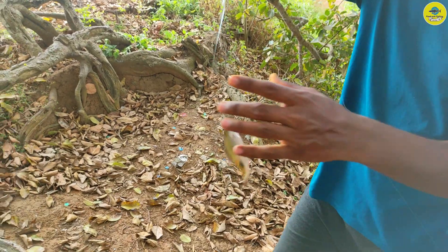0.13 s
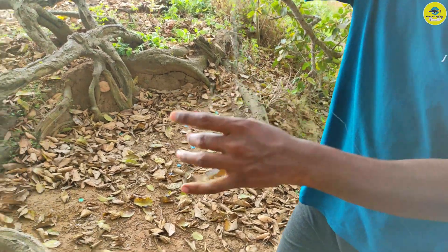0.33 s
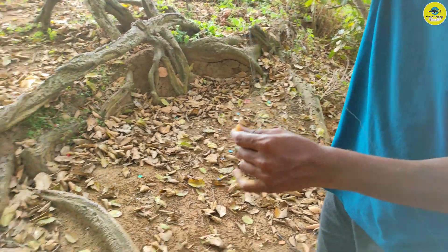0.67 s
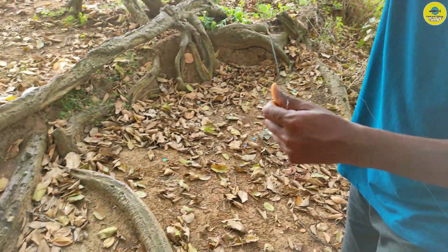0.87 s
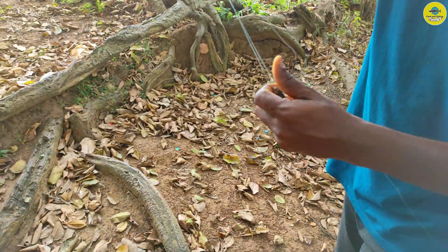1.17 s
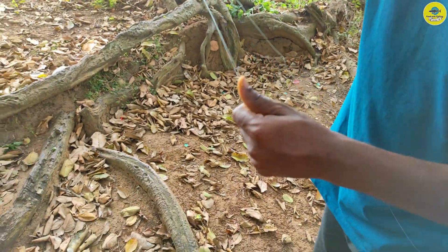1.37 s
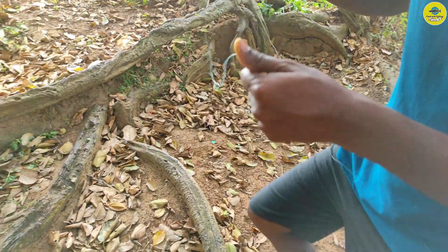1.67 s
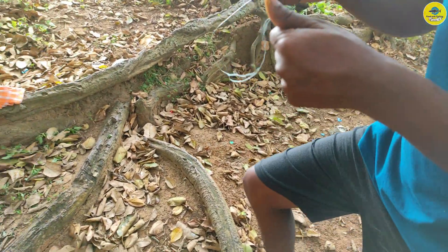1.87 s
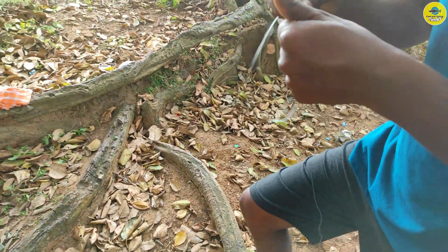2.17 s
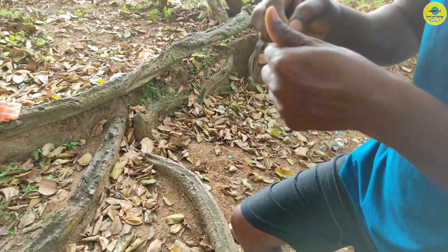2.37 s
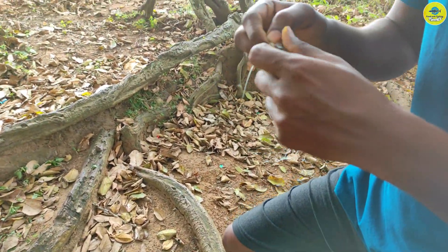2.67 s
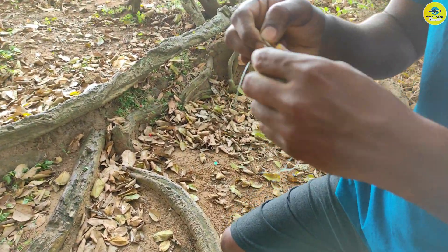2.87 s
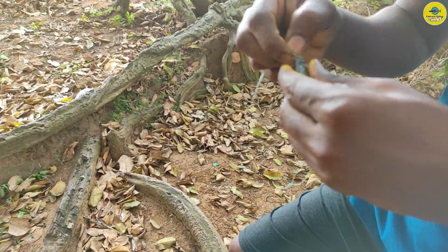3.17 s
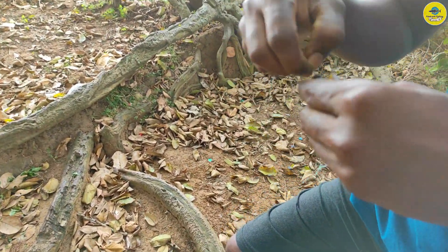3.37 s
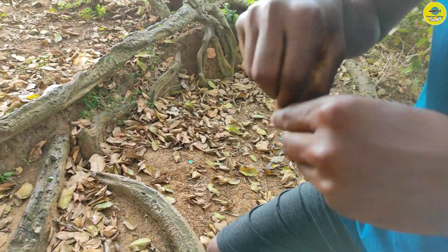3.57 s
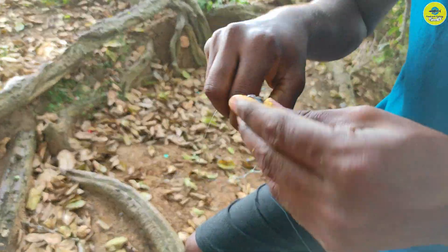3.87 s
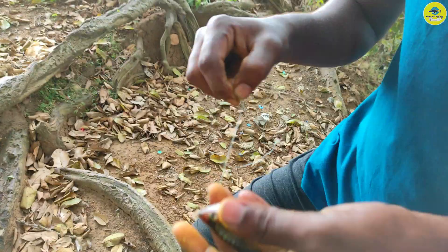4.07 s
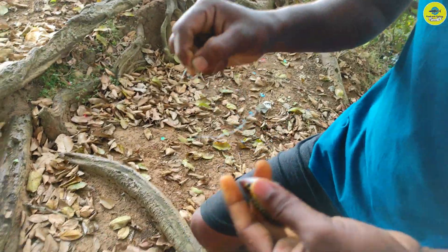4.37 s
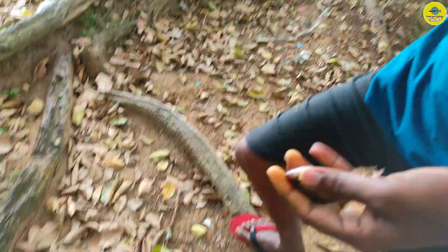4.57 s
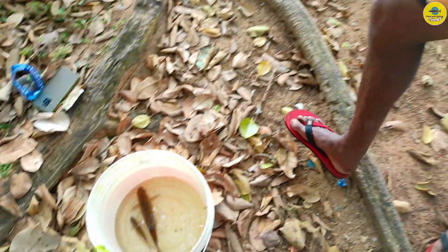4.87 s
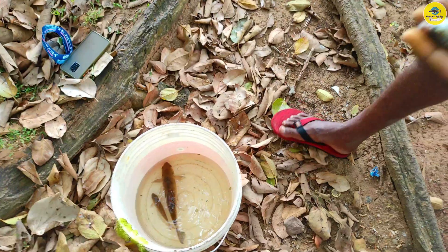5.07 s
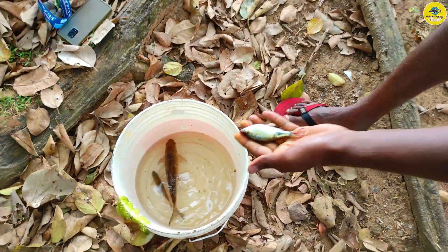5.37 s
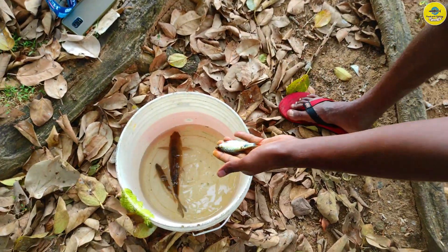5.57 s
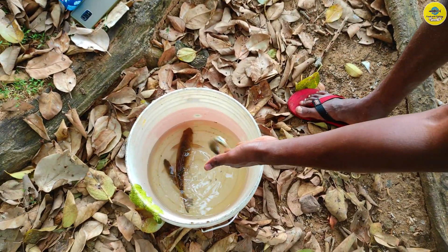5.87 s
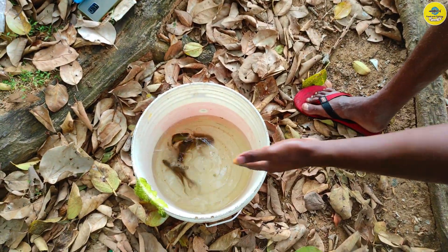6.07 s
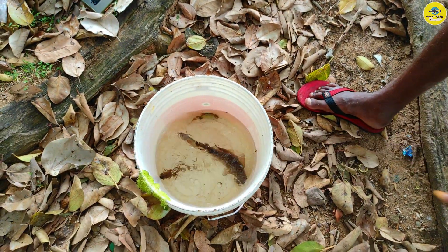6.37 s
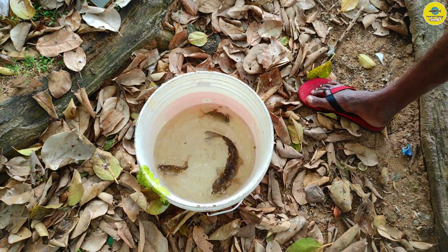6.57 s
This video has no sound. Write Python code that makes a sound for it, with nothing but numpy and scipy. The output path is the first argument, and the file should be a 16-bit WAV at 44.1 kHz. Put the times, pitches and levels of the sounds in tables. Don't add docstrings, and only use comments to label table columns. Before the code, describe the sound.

Dry leaves crunch and rustle underfoot, first a dragging shuffle, then separate hard steps with bright snaps and soft low thumps, quieter crackling between them. A dense flurry of crackles around five seconds thins to scattered ticks before a small wet plop, droplets and bubbles in a bucket. The place is open, with only a short diffuse reflection, faint wind and distant river. Close handheld stereo microphone, crisp and slightly coarse.

```python
import sys
import numpy as np
from scipy import signal
from scipy.fft import rfft, irfft, next_fast_len
from scipy.io import wavfile
from scipy.ndimage import uniform_filter1d, minimum_filter1d, map_coordinates

SR = 44100
rng = np.random.default_rng(int(sys.argv[2]) if len(sys.argv) > 2 else 0)


def elevation(decibels):
    levels = np.asarray(decibels, float)
    return 10 ** (levels / 20)


def generate_wav(signal):
    frames = np.transpose(np.atleast_2d(signal))
    scaled = np.clip(frames, -1, 1) * 32767
    pcm = np.round(scaled).astype(np.int16)
    wavfile.write(sys.argv[1], SR, pcm)


N = 296793

# f/Hz, gain/dB
LEAF_BODY = [(300, -34), (800, -7), (1100, -3), (2400, -0.5), (4500, 2), (6000, -3), (9000, -36)]


def unit(x):
    return x / np.sqrt(np.mean(x ** 2) + 1e-20)


def along(points, hz):
    f, value = np.transpose(points)
    return np.interp(np.log(hz + 1), np.log(f + 1), value)


def curves(rows):
    s, *columns = np.transpose(rows)
    return [np.interp(np.arange(N) / SR, s, column) for column in columns]


def wobble(rate):
    knots = rng.standard_normal(int(N * rate / SR) + 4)
    return map_coordinates(knots, [np.arange(N) * rate / SR])


def filtered(x, response):
    size = 2 * next_fast_len(N // 2 + 4096)
    hz = np.fft.rfftfreq(size, 1 / SR)
    return irfft(rfft(x, size) * response(hz), size)[..., :N]


def crisp(hz, edge_hz=6100):
    return 1 / (1 + (edge_hz / (hz + 1)) ** 5)


def shape(points):
    return lambda hz: elevation(along(points, hz))


def sides(pan_db):
    return np.array([elevation(pan_db / 2), elevation(-pan_db / 2)])


def pair(colour):
    # f/Hz, likeness 0..1
    likeness = [(30, 0.46), (150, 0.79), (600, 0.61), (1500, 0.45), (4000, 1), (9000, 0.37)]

    def mid_and_side(hz):
        angle = np.arccos(np.clip(along(likeness, hz), -1, 1)) / 2
        return colour(hz) * [np.cos(angle), np.sin(angle)]

    mid, side = filtered(rng.standard_normal((2, N)), mid_and_side)
    return unit(np.array([mid + side, mid - side]))


def swell(s, db, rise, fall):
    t = np.arange(N * 1000 // SR + 1) / 1000 - s
    return elevation(2 * (db - 20 * np.maximum(-t / rise, t / fall)))


def sample_db(power):
    return np.interp(np.arange(N) / SR, np.arange(len(power)) / 1000, 10 * np.log10(power))


def effort():
    # t/s, crackle level/dB, body against crisp/dB
    shuffle = [(0, -44, -14), (1.02, -49, -14), (1.66, -48.5, -22), (1.8, -43, -5), (2.3, -46, -2),
               (2.85, -42, -3), (3.1, -46, -7), (3.65, -45.5, -7), (3.77, -49, -19), (4.03, -42, -9),
               (4.11, -50, -16), (4.45, -40, -17.5), (4.73, -41, -12), (4.9, -47, -13), (5.62, -40, -9),
               (6.05, -50, -8), (6.73, -48, -15)]
    # t/s, crackle level/dB, body against crisp/dB, 20 dB fall/s
    stamps = [
        (0, -29, -1, .16),
        (1.865, -20, -16, .05),
        (1.875, -25, -7, .19),
        (2.625, -15, -17, .05),
        (4.131, -17, -14, .06),
        (4.15, -26, -17, .15),
    ]
    # peak t/s, crackle level/dB, body against crisp/dB, 20 dB rise/s, 20 dB fall/s
    scuffs = [(.18, -30.5, -12, .25, .5), (.292, -22, -6.5, .1, .17), (.735, -39.5, -6, .1, .35),
              (.915, -36, -6, .15, .11), (1.08, -19.5, -11.5, .045, .15), (1.145, -26, 0, .1, .07),
              (1.29, -38, -6, .2, .35), (2.2, -41, -6, .2, .25), (2.386, -33, -10, .07, .12),
              (2.459, -30, -6.5, .1, .25), (2.679, -19.5, -6.5, .012, .13), (3.419, -30.5, -2.5, .23, .17),
              (3.884, -18.5, -10, .06, .08), (4.796, -37.5, -8, .15, .07), (5.01, -18.5, -8, .022, .12),
              (5.135, -25.5, -11, .08, .06), (5.263, -31, -3, .15, .15), (5.393, -34, -5, .2, .15),
              (5.491, -35, -12, .5, .04), (6.149, -34.5, -10, .05, .06), (6.207, -35.5, -6, .06, .04),
              (6.29, -42, -1, .1, .15), (5.065, -28, -1, .07, .035), (5.045, -26, -12, .06, .06),
              (1.96, -32, -3, .1, .06), (1.8, -40, -4, .06, .08)]
    stamp_rise_s = .004
    moves = scuffs + [(s, db, body_db, stamp_rise_s, fall) for s, db, body_db, fall in stamps]
    powers = np.array([swell(s, db, rise, fall) for s, db, _, rise, fall in moves])
    body_share = elevation(2 * np.array(moves)[:, 2])
    level_db, body_db = curves(shuffle)
    top = elevation(2 * level_db) + elevation(2 * sample_db(powers.sum(axis=0)))
    body = elevation(2 * (level_db + body_db)) + elevation(2 * sample_db(body_share @ powers))
    return 10 * np.log10(top), 10 * np.log10(body / top)


def crackle(rate, spread_db, life):
    chance, size = rng.random(N), rng.exponential(1, N)
    power = (chance < rate / SR) * elevation(2 * spread_db * np.minimum(size, 3))
    decayed = signal.lfilter([1], [1, -np.exp(-1 / (life * SR))], power)
    return unit(np.sqrt(np.abs(decayed)))


def rustle():
    # t/s, left-right/dB
    place = [
        (0, 0),
        (1.12, .1),
        (1.5, -.4),
        (2.57, -.2),
        (3.94, -1),
        (4.05, .5),
        (6.73, .3),
    ]
    level_db, body_db = effort()
    pan_db = curves(place)[0]
    grains = crackle(rate=600, spread_db=4, life=.0008)
    ribs = crackle(rate=160, spread_db=4, life=.0015)
    rush = .32 + elevation(level_db + 27)
    total = np.sqrt(1 + rush ** 2)
    rush, grains, ribs = rush / total, grains / total, ribs / total
    top = unit(pair(crisp) * (rush + grains) * elevation(wobble(70)))
    body = unit(pair(shape(LEAF_BODY)) * (rush + .6 * grains + .7 * ribs) * elevation(wobble(60)))
    clumps_db = 1.1 * wobble(22)
    top = sides(4.7 * pan_db - 3.4) * top
    body = sides(.4 * pan_db) * elevation(body_db + 1.96) * body
    return elevation(level_db + clumps_db + 10.5) * (top + body)


def snaps():
    # t/s, peak level/dB, body against crisp/dB, left-right/dB
    big_leaves = [(.5225, -9, -18.5, 4), (.9195, -14.5, -22, 1), (1.041, -14, -20, 7), (1.068, -2, -17, 7),
                  (1.1482, -8.5, -18, -1.5), (1.2923, -14, 3, -8), (1.3932, -10, -26, -9),
                  (1.7804, -16, -13, -18), (1.8083, -12, -14, 1), (1.8694, -1, -15, 12),
                  (2.4613, -14, 1, -1), (2.482, -13.5, -25, -6), (2.6232, 2, -34, 3.5),
                  (2.6765, -6, -16, -3), (3.1325, -12, -7.5, -7.5), (3.8299, -13, -4, -5),
                  (3.8631, -11, -5, -1.5), (4.0228, -14, -8, -10), (4.1288, -4, -29, 12),
                  (4.1466, -3, -26, 1.5), (5.0075, -4, -30, -1), (5.0784, -8.5, -32, -20),
                  (5.1372, -12.5, -19, -4), (5.2666, -10, -2, -3.5), (5.3358, -10.5, -5, -6),
                  (5.3632, -13, .5, -1), (5.3887, -8, -5, 0), (5.614, -10, -25, 3.5),
                  (5.7402, -10, -10, 1.5), (5.9514, -14.5, -18, 6.5)]
    # t/s, peak level/dB, body against crisp/dB, left-right/dB
    spits = [(6.0575, -6.5, -22, 4), (6.0802, -6, -23, 6.5), (6.1366, -3.5, -24, 7), (6.196, -16, -9, 2),
             (6.209, -4, -12, -3.5), (6.255, -17, -6, 6.5), (6.28, -13, -20, 5.5), (6.3865, -18, -19, 0),
             (6.4193, -20.5, -14, 6), (6.452, -14, -24, 6.5), (6.4655, -12, -17, -2),
             (6.5158, -11, -15, -2), (6.5154, -10, -20, 2), (6.5791, -24, -18, 1), (6.6524, -24, -23, -2.5)]
    # t/s, peak level/dB
    flecks = [(.8908, -20), (2.3695, -22), (2.4099, -16), (2.4478, -17), (2.5137, -16), (3.4487, -20),
              (3.802, -18), (4.845, -18), (5.002, -16), (5.6258, -10), (5.842, -16), (5.519, -21),
              (5.911, -22), (5.975, -24), (.968, -22), (.824, -21)]
    # t/s, peak level/dB, left-right/dB
    more_snaps = [(0.0585, -16, -7), (0.253, -7, 2), (0.4809, -18, -5), (0.5232, -1, 4), (0.6127, -17, -10),
                  (0.6305, -19, -4), (0.6649, -19, -4), (0.9208, -13, -3), (1.0804, 0, 4), (1.9327, -16, 0),
                  (2.0094, -15, 3), (2.239, -15, 3), (2.4827, -12, -6), (2.5334, -12, -12), (2.5751, -12, -12),
                  (3.1332, -16, -7), (3.1987, -17, 5), (3.6512, -24, -3), (3.6596, -11, 4), (3.6777, -23, 3),
                  (3.7356, -14, -2), (4.0537, -19, -6), (4.7581, -14, 0), (5.0085, -6, 3), (5.0499, -7, -4),
                  (5.0669, -10, -2), (5.0795, -6, -6), (5.1379, -5, -9), (5.2052, -19, 0), (5.2341, -13, 2),
                  (5.2684, -11, -8), (5.3182, -14, -3), (5.3371, -12, -5), (5.3628, -13, 2), (5.3898, -10, 2),
                  (5.4224, -11, -5), (5.4709, -8, 0), (5.4961, -15, -3), (5.5427, -16, 3), (5.6459, -13, 11),
                  (5.6982, -19, -8), (5.7608, -16, -10), (5.7888, -16, -5), (5.8029, -17, 0), (5.8943, -25, -4),
                  (5.9519, -11, 2), (6.1197, -17, -3), (6.1506, -8, 7), (6.1618, -14, -1), (6.2093, -9, -6),
                  (6.2267, -18, 6), (6.2564, -16, 4), (6.2889, -18, 0), (6.3155, -19, 0), (6.4199, -21, -1),
                  (6.5052, -15, 4), (6.5528, -22, -2), (6.6099, -22, 0), (6.6297, -22, -2), (6.7263, -22, -3)]
    events = big_leaves + spits
    events = events + [(s, db, -16, 6 * rng.standard_normal()) for s, db in flecks]
    events = events + [(s, db - 1.5, -22, pan_db) for s, db, pan_db in more_snaps]
    top, body = np.zeros((2, N + SR)), np.zeros((2, N + SR))
    t = np.arange(SR // 16) / SR
    for s, db, body_db, pan_db in events:
        t60 = 0.0067 * elevation(0.2 * db + 2.0)
        fade = elevation(db - 60 * t / t60) * (1 - np.exp(-t / 0.00032))
        shared, own = rng.standard_normal((2, 1, len(t))), rng.standard_normal((2, 2, len(t)))
        bursts = []
        for burst in (shared + 0.29 * own) * fade:
            even = np.linalg.norm(fade) / np.linalg.norm(burst[0])
            bursts.append(burst * even * sides(pan_db)[:, None])
        lag = np.clip(.1 * pan_db + 1.3, -4, 4)
        for ear, sign in enumerate([-1, 1]):
            at = max(round(s * SR) + round(sign * lag), 0)
            top[ear, at:at + len(t)] += bursts[0][ear]
            body[ear, at:at + len(t)] += elevation(body_db) * bursts[1][ear]
    return elevation(8) * filtered(top[:, :N], crisp) + elevation(10.5) * filtered(body[:, :N], shape(LEAF_BODY))


def ticks():
    # t/s, peak level/dB, f/Hz
    stalks = [(.2154, -20, 2420), (.254, -10, 2390), (.2815, -13, 2500), (.3111, -5, 2730),
              (.396, -13.5, 3790), (1.0672, -10, 4180), (1.138, -17, 2330), (1.2068, -17.5, 2600),
              (1.2915, -19, 4180), (1.7275, -29, 1700), (1.8605, -15, 4300), (1.932, -21, 1540),
              (2.0081, -17.5, 1180), (2.128, -22, 1300), (2.1928, -22, 2270), (2.4463, -15, 3640),
              (2.4988, -12, 3840), (2.6307, -15.5, 2560), (3.4166, -15, 3100), (3.458, -13.5, 1670),
              (3.8698, -19, 1530), (4.9923, -18, 2840), (5.01, -11, 2890), (5.322, -17, 3900),
              (5.337, -22, 1900), (5.3633, -8, 2890), (5.4922, -17, 1190), (5.7417, -19.5, 3730),
              (1.8306, -26, 1500), (1.843, -28, 1550), (.722, -28, 2200), (.783, -28, 1700),
              (.858, -29, 2300), (.825, -29, 1900), (2.1733, -24, 4050), (2.2845, -28, 2480),
              (3.5048, -22, 3280),
              (0.0595, -27, 3170), (0.1523, -21, 2710), (0.4615, -23, 2500), (0.7068, -32, 1680),
             (1.1388, -5, 3320), (1.1484, -13, 2300), (1.394, -24, 5150), (1.781, -29, 2780),
             (1.797, -24, 3830), (1.8085, -21, 3530), (1.8603, -18, 4350), (2.4981, -11, 3770),
             (2.9407, -22, 3790), (2.9611, -20, 3380), (3.1201, -31, 2890), (3.1516, -28, 2780),
             (3.431, -19, 1790), (3.5618, -19, 4720), (3.5899, -22, 4630), (3.6317, -24, 1850),
             (3.6512, -29, 2430), (4.1462, -18, 5040), (4.845, -29, 4010), (5.0774, -18, 1640),
             (5.6136, -18, 3960), (5.6261, -17, 3600), (5.7267, -31, 2910), (5.7618, -21, 2480),
             (6.0808, -19, 4740), (6.314, -25, 2390)]
    out, t = np.zeros(N + SR), np.arange(SR // 20) / SR
    for s, db, hz in stalks:
        lower_hz = rng.uniform(.55, .75) * hz
        ring = np.sin(2 * np.pi * hz * t) + .7 * np.sin(2 * np.pi * lower_hz * t)
        puff = 1.41 * uniform_filter1d(rng.standard_normal(len(t)), size=5)
        fade = elevation(-60 * t * hz / 10) * (1 - np.exp(-t / .0002))
        out[round(s * SR):][:len(t)] += elevation(db + 11.5) * fade * (ring + puff)
    return out[:N]


def thuds():
    # t/s, peak level/dB, f/Hz, t60/s
    notes_rung = [(1.071, -16.5, 295, .04), (1.07, -17, 540, .045), (1.066, -20, 660, .03),
                  (1.072, -18, 750, .045), (1.082, -21, 350, .05), (1.089, -19.5, 150, .1),
                  (1.105, -27, 1000, .1), (1.869, -8, 645, .04), (1.87, -14, 255, .055),
                  (1.87, -18, 370, .1), (1.88, -19, 760, .05), (1.895, -20.5, 155, .09),
                  (1.868, -20, 1020, .04), (2.008, -13, 1150, .018), (2.008, -15, 1400, .015),
                  (2.009, -15, 900, .02), (2.009, -15, 500, .02), (2.01, -14, 290, .03),
                  (2.63, -10, 250, .065), (2.63, -11, 500, .05), (2.633, -11, 730, .06),
                  (2.633, -15, 370, .04), (2.652, -22, 150, .12), (2.676, -19, 250, .04),
                  (2.678, -20, 720, .1), (2.676, -22, 930, .04), (4.132, -21, 228, .057),
                  (4.134, -21, 590, .04), (4.134, -21, 790, .04), (.3, -19, 653, .03), (.3, -25, 1060, .02),
                  (3.457, -30, 200, .056), (3.457, -31, 430, .05), (3.457, -31, 560, .05),
                  (4.69, -42, 720, .06), (.76, -37, 620, .06)]
    rise, sag = .08, .05
    out, t = np.zeros(N + SR), np.arange(SR // 3) / SR
    for s, db, hz, t60 in notes_rung:
        pitch = hz * (1 + sag * (.3 - np.minimum(3 * t / t60, 2)))
        fade = elevation(db + 7 - 60 * t / t60) * (1 - np.exp(-t / (rise * t60)))
        out[round(s * SR):][:len(t)] += fade * np.sin(2 * np.pi * np.cumsum(pitch) / SR)
    return out[:N]


def bubbles():
    # t/s, peak level/dB, start f/Hz, rise as a share, t60/s
    pockets = [(6.12, -28, 3320, 0.046, 0.022), (6.137, -21, 1150, .6, .055), (6.125, -34, 2300, .05, .02),
               (6.172, -33, 2100, .1, .03), (6.197, -23, 560, .02, .035), (6.213, -32, 1050, .05, .03),
               (6.235, -35, 1250, .1, .03), (6.268, -31, 900, .05, .04), (6.289, -25, 2250, .2, .06),
               (6.29, -20, 2900, .03, .02), (6.383, -37, 900, .05, .04), (6.4, -40, 500, .3, .05),
               (6.428, -34, 1250, .05, .025), (6.43, -37, 3700, .03, .02), (6.445, -35, 850, .08, .05),
               (6.472, -37, 3600, .03, .02), (6.506, -38, 1600, .05, .03), (6.516, -22, 4700, .02, .02),
               (6.554, -36, 1800, .2, .04), (6.591, -37, 4500, .02, .02), (6.137, -31, 430, -.05, .05),
               (6.162, -20.5, 1560, .1, 0.045), (6.188, -29, 1140, .1, .04), (6.198, -26, 390, .06, .055),
               (6.219, -33, 420, .15, .05), (6.21, -16.5, 4330, 0.059, 0.026),
               (6.211, -16, 2300, 0.06, 0.013), (6.256, -30, 3920, 0.028, .025), (6.27, -26, 1500, .5, .05),
               (6.278, -24, 2030, .15, .05), (6.288, -13, 3720, 0.06, 0.017),
               (6.314, -28, 2370, .05, 0.026), (6.322, -35, 835, .05, 0.093),
               (6.4, -33.5, 1490, 0.164, .05), (6.439, -31.5, 1170, .05, 0.033),
               (6.487, -41, 1350, 0.043, 0.063), (6.517, -34, 2310, 0.036, 0.038),
               (6.521, -39.5, 940, 0.17, 0.08), (6.543, -26, 1456, 0.37, 0.041),
               (6.56, -35, 2100, 0.19, 0.05)]
    swarm = []
    for when, loud, high, climb in rng.random((260, 4)):
        hz = 330 * 11 ** high
        swarm.append((6.12 + 0.46 * when ** 1.5, -51 + 12 * loud, hz, .5 * climb, 22 / hz))
    flutter_db, stray = 3 * wobble(200), .03 * wobble(200)
    out, length = np.zeros(N + SR), SR // 5
    for s, db, hz, rise, t60 in pockets + swarm:
        start = round(s * SR)
        at = slice(start, min(start + length, N))
        t = np.arange(at.stop - at.start) / SR
        pitch = hz * (1 + rise * 3 * t / t60 + stray[at])
        fade = elevation(db + 9 + flutter_db[at] - 60 * t / t60) * (1 - np.exp(-t / .0012))
        out[at] += fade * np.sin(2 * np.pi * np.cumsum(pitch) / SR)
    return out[:N]


def ground():
    presses = [
        (0, -48, .1, .8),
        (.3, -39.5, .15, .12),
        (1.085, -30.5, .05, .2),
        (1.88, -37, .05, .3),
        (2.01, -40, .1, .14),
        (2.645, -27.5, .02, .17),
        (5.04, -43, .12, .12),
    ]
    # f/Hz, gain/dB
    soil = [(60, -30), (120, -3.5), (250, -0.5), (700, -7.5), (1000, -14), (2000, -36)]
    rest_db = -51.5
    level_db = sample_db(elevation(2 * rest_db) + sum(swell(*row) for row in presses))
    return elevation(level_db + 6) * unit(pair(shape(soil)) * elevation(2.3 * wobble(45)))


def wind():
    # t/s, level/dB
    strength = [
        (0, -56),
        (2.5, -57.5),
        (2.7, -53.5),
        (5.53, -59.5),
        (6.11, -45),
        (6.21, -56),
        (6.73, -61),
    ]
    # f/Hz, gain/dB
    gust = [(8, 9), (20, -6.5), (40, 0), (80, -12.5), (200, -66.5)]
    return elevation(curves(strength)[0] + 13.5) * unit(pair(shape(gust)) * elevation(1.1 * wobble(5.3)))


def river():
    # f/Hz, gain/dB
    hum = [(18, -39), (30, -9), (104, 4.5), (250, -5.5), (409, -6), (455, -68.5), (1750, -47), (2470, -12),
           (5000, -11), (6500, -50), (11000, -120)]
    return elevation(-49 + wobble(3.2)) * pair(shape(hum))


def scatter(x, t60):
    t = np.arange(SR // 4) / SR
    tail = rng.standard_normal((2, len(t))) * elevation(-60 * t / t60)
    return signal.fftconvolve(x, tail / np.linalg.norm(tail[0]), axes=1)[:, :N]


def scene():
    hits = snaps() + filtered(ticks(), lambda hz: crisp(hz, edge_hz=1060))
    hits = hits + elevation(-9) * scatter(hits, t60=0.074)
    water = bubbles()
    bucket = water + elevation(-4) * scatter(water[None].repeat(2, axis=0), t60=.07)
    return rustle() + hits + thuds() + bucket + ground() + wind() + river()


def causal(gain):
    cepstrum = irfft(np.log(gain + 1e-6))
    half = cepstrum.shape[-1] // 2
    cepstrum[..., 1:half] *= 2
    cepstrum[..., half + 1:] = 0
    return np.exp(rfft(cepstrum))


def ports(x):
    # f/Hz, gain/dB
    mic = [(20, -4.5), (4500, -8.5), (6000, -5.5), (7400, 4), (9060, 1), (10300, -13.5), (14300, -22),
           (15900, -36), (16500, -74)]
    # f/Hz, left-right/dB
    difference = [(60, 6), (400, 6.5), (1300, 2), (4400, 0), (6800, -1), (7800, -1.5), (8800, 8.5),
                  (11000, 9.5), (15000, 0.5)]
    delay_s = np.array([[6e-5], [0]])

    def response(hz):
        gain = elevation(along(mic, hz)) * sides(along(difference, hz))
        return causal(gain) * np.exp(-2j * np.pi * hz * delay_s)

    return filtered(x, response)


def thin_out(x, size, step_db, quiet_db, odds):
    # f/Hz, share
    loss = [(2000, 0), (3000, .1), (6000, .14), (6900, 0), (9400, 0), (10200, .3), (13000, .25),
            (15000, .5)]
    hz, t, z = signal.stft(x, SR, nperseg=size)
    hz = hz[:, None]
    cells = (len(hz) // 6 + 1, len(t) // 4 + 1)

    def spread(v):
        return np.repeat(np.repeat(v, 6, axis=0), 4, axis=1)[:len(hz), :len(t)]

    power = (np.abs(z) ** 2).sum(axis=0)
    level_db = 10 * np.log10(uniform_filter1d(power, size=6, axis=0) + 1e-20)
    loudest_db = -minimum_filter1d(-level_db, size=15, axis=1)
    chosen = spread(rng.random(cells)) < odds * along(loss, hz)
    lost = chosen & (level_db < loudest_db - quiet_db)
    uneven = elevation(step_db * spread(rng.standard_normal(cells)) * (hz > 1500))
    return signal.istft(z * uneven * np.where(lost, .003, 1), SR, nperseg=size)[1][:, :N]


def roll_off(x):
    return signal.sosfilt(signal.butter(12, 16450, fs=SR, output="sos"), x)


def record(dry):
    x = ports(dry)
    x = x / (1 + np.abs(x / .85) ** 4) ** (1 / 4)
    x = thin_out(x, size=256, step_db=0, quiet_db=10, odds=4.5)
    x = thin_out(x, size=1024, step_db=1.8, quiet_db=2, odds=1.7)
    return roll_off(x)


dry = scene()
out = record(dry)
generate_wav(out)
```